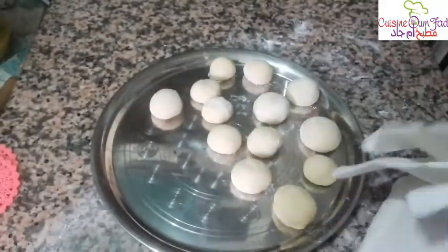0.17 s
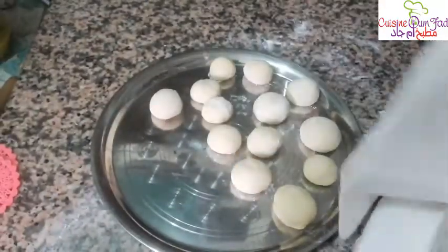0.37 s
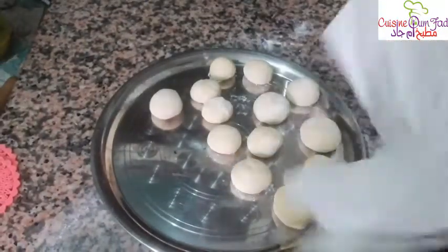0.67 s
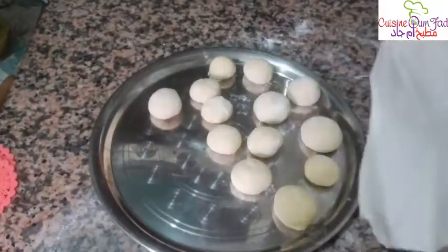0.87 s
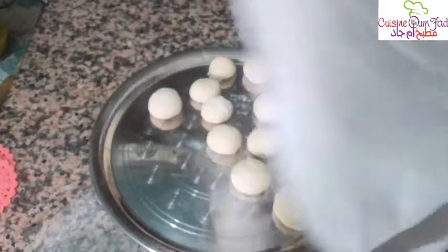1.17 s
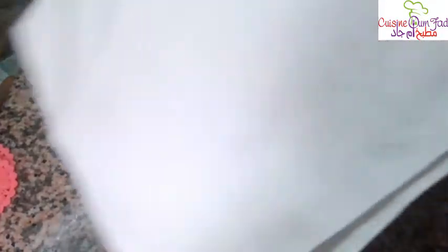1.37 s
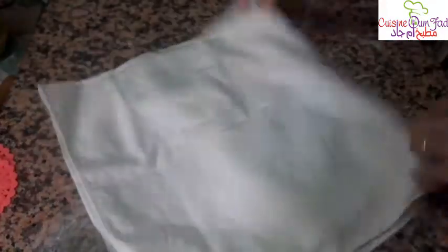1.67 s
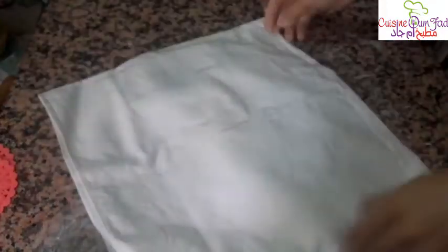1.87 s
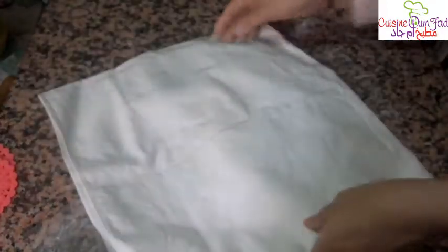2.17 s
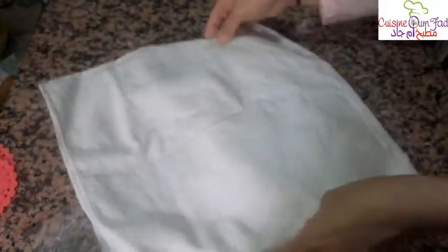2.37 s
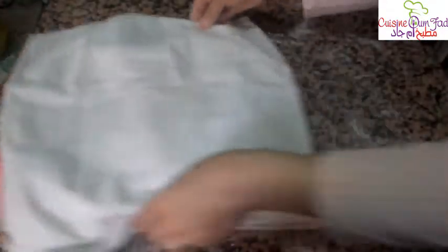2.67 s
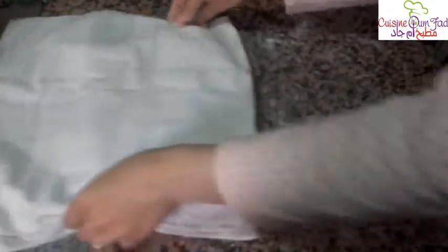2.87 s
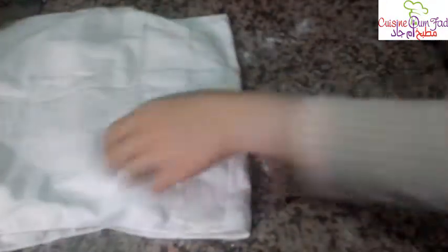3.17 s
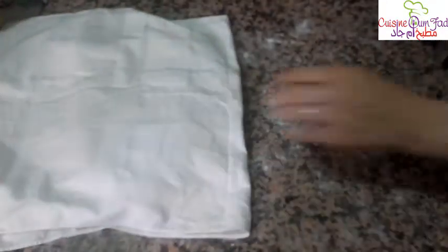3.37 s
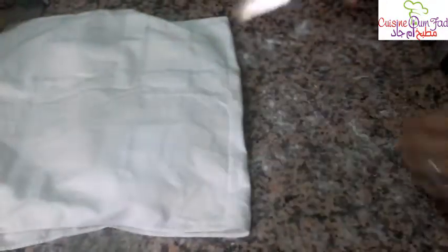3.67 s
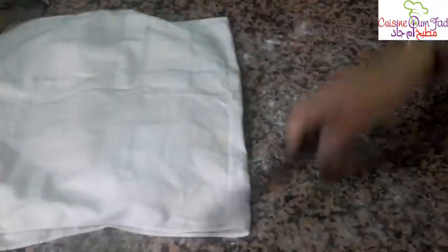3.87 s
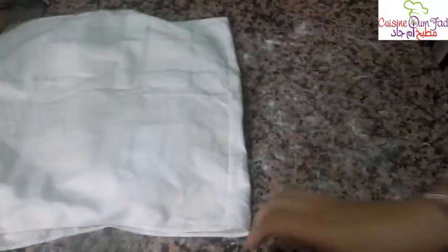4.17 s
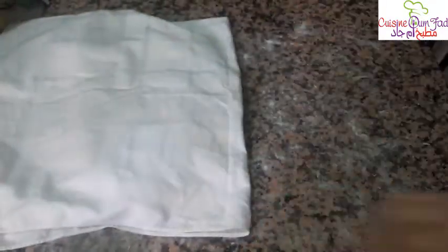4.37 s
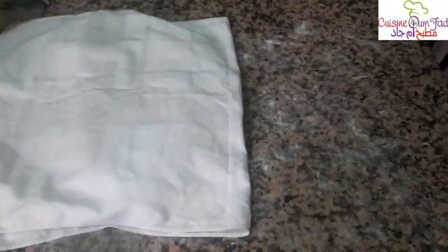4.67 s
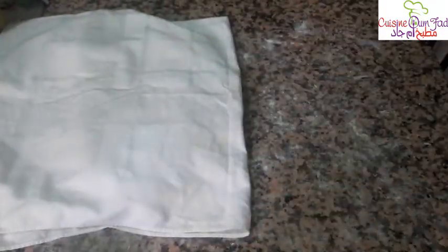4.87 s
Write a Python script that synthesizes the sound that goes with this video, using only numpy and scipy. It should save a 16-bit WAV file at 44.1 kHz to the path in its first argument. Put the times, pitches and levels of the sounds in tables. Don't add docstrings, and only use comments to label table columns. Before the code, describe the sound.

A cloth towel is flapped open and laid over a metal tray, a damped tray knock follows, then a small hard object clicks down in a kitchen.

```python
import sys
import numpy as np
from scipy import signal
from scipy.fft import rfft, irfft, next_fast_len
from scipy.io import wavfile
from scipy.ndimage import uniform_filter1d

SR = 44100
rng = np.random.default_rng(int(sys.argv[2]) if len(sys.argv) > 2 else 0)


def store_pcm(level_fs):
    pcm = np.round(np.clip(level_fs, -1, 1) * 32767).astype(np.int16)
    wavfile.write(sys.argv[1], SR, np.atleast_2d(pcm).T)


def boost(x):
    u = np.asarray(x, float) / 20
    return 10 ** u


N = 220762

# frequency in Hz, density in dB per Hz.
AIR_SPECTRUM = [(9, -26), (15, -13), (32, -28.5), (70, -27), (110, -17.5), (250, -12), (500, -13),
                (870, -14), (1140, -17), (2640, -24.5), (4990, -33.5), (6680, -31.5), (15600, -28.5),
                (15900, -83)]
# frequency in Hz, level in dB rms.
HUM_PARTIALS = [(98.7, -94.5), (296, -76.5), (395, -83.5), (640.6, -89), (1281, -87), (2562, -92),
                (4188, -94.5)]
# time in seconds, level in dB.
WHINE_LEVEL = [(0, -74), (1.2, -76), (1.75, -80.5), (2, -85), (2.85, -81.5), (4.1, -82.5), (4.6, -74),
               (5.01, -80)]

# frequency in Hz, density in dB per Hz.
FLAP_SPECTRUM = [(60, -47), (110, -14.5), (170, -8), (400, -0.5), (620, -0.5), (800, -32)]
# frequency in Hz, density in dB per Hz.
FOLD_SPECTRUM = [(480, -25.5), (650, 0), (1100, 1.5), (1800, 0), (2200, -10.5), (2600, -55)]
# frequency in Hz, density in dB per Hz.
RUB_SPECTRUM = [(1600, -28), (2200, 1), (3500, -4), (5000, -7), (7000, -24)]
# frequency in Hz, density in dB per Hz.
FIBRE_SPECTRUM = [(3800, -21), (5800, -2), (8500, -2), (11000, -2), (15600, -6), (15850, -59)]
# peak time in seconds, length in seconds, folds in dB,
# bulk of sheet moved in dB, dry slide of fibres in dB.
SHAKES = [(.03, 0.33, -73.5, -2, 0), (.158, 0.011, -64.5, 4.5, -11), (.205, 0.037, -71.5, 0, -0.5),
          (.3, 0.053, -70, -3, -5), (.405, 0.071, -58, -5, -4.5), (.45, 0.077, -55.5, -10, -1.5),
          (.478, 0.033, -58, -6, -1.5), (.57, 0.094, -68.5, 0, -0.5), (.626, 0.023, -67, -11, -6),
          (.68, 0.076, -66, -2.5, 0.5), (.76, 0.13, -66, -1.5, -3.5), (.945, 0.06, -70.5, -3, -0.5),
          (.995, 0.077, -70.5, 1, 0.5), (1.138, 0.075, -68, -3, 1), (1.228, 0.068, -66, 2, 1.5),
          (1.3, .1, -76.5, 3, 1), (1.4, .05, -74, 1, 0)]
# peak time in seconds, length in seconds,
# folds in dB, bulk in dB, slide in dB.
TUGS = [(1.69, 0.022, -63.5, 4.5, -14), (1.725, .05, -57.5, -6, -13.5), (1.756, 0.048, -54, 0.5, -15),
        (1.803, 0.058, -55, 2.5, -16.5), (1.885, .07, -70.5, -2, -23), (1.99, 0.054, -83, -6, 2),
        (2.11, 0.077, -70.5, 1, -4), (2.172, 0.074, -61.5, -5, -4.5), (2.27, .07, -65, -5.5, -6),
        (2.314, 0.057, -56, -7.5, -6), (2.356, 0.061, -69.5, 6, -6), (2.408, 0.057, -60, -12, -9.5),
        (2.444, 0.073, -59.5, -6, -13), (2.56, .05, -74.5, 1, -8), (2.792, .1, -72.5, 1, -6),
        (3.068, 0.086, -77, -3, 10)]
# peak time in seconds, length in seconds,
# folds in dB, bulk in dB, slide in dB.
BRUSHES = [(3.39, 0.064, -77, -2, -9), (3.56, 0.076, -77, 0, -7), (3.62, 0.13, -77, -3, -4.5),
           (3.8, 0.029, -72, -7, 1), (4.51, 0.083, -65.5, -1, -9), (4.55, .04, -74, 2, -1),
           (4.618, .09, -62.5, -2, 2), (4.67, .09, -64, -5, -2), (4.757, 0.049, -68, -5, -1),
           (4.8, 0.057, -70, -3, -4), (4.875, 0.088, -75, 2.5, -1.5), (4.94, .05, -74, 4, -6)]
# time in seconds, folds level in dB.
RUSTLE_LEVEL = [(0, -77.5), (1.3, -81.5), (1.55, -89), (2.2, -79.5), (2.85, -79), (3.15, -88.5),
                (4.1, -89.5), (4.6, -73.5), (5.01, -84)]
# start in seconds, peak in dB, pitch in Hz.
SLAPS = [(0.405, -42, 1300), (.451, -42, 1200), (.623, -55, 1500), (1.688, -50, 900), (1.7077, -50, 1300),
         (1.7151, -51, 1100), (1.7395, -47, 900), (1.754, -42, 800), (1.784, -43, 603), (1.7907, -42, 900),
         (1.795, -43, 450), (1.8053, -38, 980), (2.316, -46.5, 1690)]
# start in seconds, peak in dB, centre in Hz, decay rate per second,
# grit from 0 to 1.
THREAD_SNAPS = [
    (.451, -49, 8000, 300, .9),
    (.622, -55, 3440, 180, 0.76),
    (.674, -53, 7370, 93, 0.65),
    (.935, -54, 7240, 270, 0.65),
    (1.226, -51, 7020, 150, .9),
    (1.39, -65, 9100, 120, .9),
    (1.752, -50.5, 4440, 200, .9),
    (3.656, -56, 7060, 770, 0.96),
    (3.798, -53.5, 7930, 180, 0.93),
    (4.752, -65, 6900, 150, 0.8),
]

# frequency in Hz, width in Hz, level in dB,
# time to full swing in seconds.
TRAY_MODES = [(500, 45, -19, 0.0042), (800, 130, -8, 0.0054), (1205, 138, -15, 0.004),
              (1654, 380, 1.5, 0.0044), (2782, 290, -19, 0.0053), (3680, 384, -25, 0.001),
              (4730, 450, -28, 0.0031), (5793, 450, -38, 0.0042), (7470, 320, -42.5, 0.0031)]
# start in seconds, peak in dB, pitch in Hz, length in cycles.
BLOWS = [
    (4.1797, -29.5, 1260, 1.7),
    (4.184, -34, 1290, 1.7),
    (4.2068, -38.5, 1200, 2),
    (4.231, -43, 1240, 3),
    (4.2451, -33, 640, 0.56),
    (4.2521, -22.5, 1646, 5.8),
    (4.2539, -16.5, 1024, 1.67),
    (4.2664, -27, 1200, 1.3),
    (4.283, -40, 1310, 2.2),
]
# start in seconds, peak in dB, centre in Hz,
# decay rate per second, grit from 0 to 1.
CLICKS = [(4.1782, -14.5, 11100, 1000, .8), (4.1786, -29.5, 7230, 370, 0.7),
          (4.1792, -38.5, 3780, 400, 0.3), (4.179, -39, 2950, 400, .2), (4.182, -21, 9300, 1300, 0.51),
          (4.2058, -38, 9000, 1700, 0.81), (4.252, -33, 8000, 1100, .8), (4.2541, -15.5, 3508, 1500, 0.62),
          (4.2557, -30, 6900, 1300, .6), (4.2651, -7.5, 7710, 5900, .3), (4.2731, -31.5, 8050, 880, 0.7),
          (4.282, -34, 8060, 1500, .6)]

# frequency in Hz, t60 in seconds.
KITCHEN_T60 = [(150, 0.61), (500, 0.55), (1500, 0.47), (3000, 0.53), (5000, .4), (8000, .42), (11000, 0.38),
               (15000, .22)]
# delay in seconds, level in dB.
WALL_ECHOES = [(.0065, -4), (.0095, 0.5), (0.0153, -13.5), (0.0192, -8.5), (.025, -17), (.043, -11)]
# frequency in Hz, density in dB per Hz.
KNOCK_FAR = [(120, -58), (200, -27.5), (400, -29), (500, -8), (600, -11), (790, -1), (950, -11),
             (1150, -0.5), (1350, -9), (1620, -1), (2120, -4), (2320, -22.5), (2700, -12.5), (3570, -32.5),
             (4200, -36), (4800, -31), (5400, -38.5), (11700, -69)]
# frequency in Hz, density in dB per Hz.
CLICK_FAR = [(88, -49), (150, -29), (270, -2.5), (520, -2), (830, -13), (1200, -1), (3440, -17.5),
             (4500, -13), (7070, 0.5), (9280, -9.5), (14200, -6.5), (15600, -19), (15900, -70)]
# frequency in Hz, density in dB per Hz.
THUD_FAR = [(59, -62), (156, -11), (300, -13), (390, -2), (580, -8.5), (810, -5), (1500, -1), (2020, -11.5),
            (3000, -12.5), (4400, -20.5), (8000, -51)]
# frequency in Hz, density in dB per Hz.
SNAP_FAR = [(2500, -39.5), (4400, -13), (6500, -4), (9250, -1.5), (12000, -9.5), (15600, -17), (15900, -71)]
# release in seconds, energy in dB.
KNOCK_WET = [
    (2.883, 3.84),
]
# release in seconds, energy in dB.
CLICK_WET = [
    (4.1786, -8.5),
    (4.206, -26),
]
# release in seconds, energy in dB.
THUD_WET = [
    (4.2545, -4.5),
    (4.2655, -15),
    (4.29, -14),
]
# release in seconds, energy in dB.
SNAP_WET = [
    (4.2544, -16.5),
    (4.2644, -5.5),
]

# rub against folds in dB, tilt of the hiss toward the treble in dB.
ON_CLOTH, ON_TRAY, ON_STONE = (-5, 0.3), (-2.17, -1.2), (-0.85, -2.5)


def evened(x):
    return x / np.sqrt(np.mean(x ** 2) + 1e-20)


def read(points, hz):
    f, value = np.transpose(points)
    return np.interp(np.log(hz + 1), np.log(f + 1), value)


def add(mix, start_s, sound):
    part = mix[round(start_s * SR):][:len(sound)]
    part += sound[:len(part)]


def coloured(x, spectrum):
    size = next_fast_len(len(x))
    gain = boost(read(spectrum, np.fft.rfftfreq(size, 1 / SR)))
    return evened(irfft(rfft(x, size) * gain, size)[:len(x)])


def smoothed(x, size, axis=-1):
    return uniform_filter1d(uniform_filter1d(x, size, axis=axis), size, axis=axis)


def drift(size):
    return evened(smoothed(rng.standard_normal(N), size))


def curve(rows):
    t = np.arange(N) / SR
    time_s, level_db = np.transpose(rows)
    fade = np.clip(np.minimum(t - time_s[0], time_s[-1] - t) * 300 + 0.5, 0, 1)
    return fade * boost(np.interp(t, time_s, level_db))


def butter(x, order, hz, kind):
    return signal.sosfilt(signal.butter(order, hz, kind, fs=SR, output="sos"), x)


def split(x, hz):
    low = signal.sosfiltfilt(signal.butter(2, hz, fs=SR, output="sos"), x)
    return np.array([low, x - low])


def wavelet(hz, cycles):
    u = np.arange(int(6 * cycles * SR / hz)) * hz / SR / cycles * 4
    return u ** 2 * np.exp(2 - u) / 4 * np.sin(2 * np.pi * u * cycles / 4)


def bursts(events):
    out, t = np.zeros(N), np.arange(1400) / SR
    for start_s, db, hz, rate, grit in events:
        noise = rng.standard_normal(len(t))
        grain = 1 - grit + grit * evened(uniform_filter1d(noise, size=6))
        envelope = np.minimum(t / 0.00014, 1) * np.exp(-t * rate)
        shape = envelope * grain * np.sin(2 * np.pi * hz * t)
        add(out, start_s, boost(db) * shape / abs(shape).max())
    return butter(out, 3, 2600, "high")


def hum():
    t, out = np.arange(N) / SR, np.zeros(N)
    for hz, db in HUM_PARTIALS:
        level = boost(db + 3.5 + 0.9 * drift(size=9000))
        out += level * np.sin(2 * np.pi * (hz * t + 0.03 * drift(size=6000)))
    return out


def air(level_db=-70):
    _, _, z = signal.stft(coloured(rng.standard_normal(N), AIR_SPECTRUM), SR, nperseg=512)
    patches = uniform_filter1d(rng.standard_normal(z.shape), size=8, axis=0)
    patches = evened(uniform_filter1d(patches, size=10, axis=1))
    noise = evened(signal.istft(z * boost(0.66 * patches), SR, nperseg=512)[1][:N])
    return boost(level_db) * noise * boost(0.7 * drift(size=5000))


def whine(hz=488.6):
    cycles = hz * np.arange(N) / SR + 0.074 * drift(size=3000)
    return np.sqrt(2) * curve(WHINE_LEVEL) * np.sin(2 * np.pi * cycles)


def scratch(per_s, spread_db, smooth):
    size = boost(spread_db * np.minimum(rng.exponential(1, N), 4))
    size = size * (rng.random(N) < per_s / SR)
    return evened(size * rng.standard_normal(N)) + smooth * rng.standard_normal(N)


def fibres():
    hiss = coloured(scratch(6000, 2.2, 1.0), FIBRE_SPECTRUM)
    return split(hiss, 9500) * boost(1.0 * drift(size=200))


def strokes(rows, surface, rise_share=0.52, edge_db=-9.0, pointed=1.33, rub_follows_slide=0.77):
    peak_s, length_s, db, bulk_db, slide_db = np.transpose(rows)[:, :, None]
    rub_db, tilt_db = surface
    coarse = np.arange(0, N, 32)
    u = (coarse / SR - peak_s) / length_s
    distance = np.where(u < 0, -u / rise_share, u / (1 - rise_share))
    swell = boost(db + edge_db * distance ** pointed)
    layers_db = [bulk_db, 0 * db, rub_db + rub_follows_slide * slide_db,
                 slide_db - tilt_db, slide_db + tilt_db]
    powers = [((swell * boost(layer_db)) ** 2).sum(0) for layer_db in layers_db]
    return np.array([np.interp(np.arange(N), coarse, power) for power in powers])


def cloth():
    flap = coloured(scratch(600, 1.0, 1.4), FLAP_SPECTRUM) * boost(1.4 * drift(size=400))
    folds = coloured(scratch(1500, 2.8, 1.26), FOLD_SPECTRUM) * boost(1.25 * drift(size=300))
    rub = coloured(scratch(3300, 2.21, 1.9), RUB_SPECTRUM) * boost(1.6 * drift(size=200))
    layers = [flap, folds, rub, *fibres()]
    power = strokes(SHAKES, ON_CLOTH) + strokes(TUGS, ON_TRAY) + strokes(BRUSHES, ON_STONE)
    rustle_db = [[-3.5], [0], [-5.5], [-6.5], [-6.5]]
    rustle = boost(rustle_db) * curve(RUSTLE_LEVEL)
    out = (np.sqrt(power + rustle ** 2) * layers).sum(0)
    for start_s, db, hz in SLAPS:
        add(out, start_s, boost(db) * wavelet(hz, 1.54))
    return out


def knock(start_s=2.8792, peak_db=-8.5):
    t, out, ring = np.arange(1500) / SR, np.zeros(N), 0
    for hz, width_hz, db, rise_s in TRAY_MODES:
        swell = np.sin(np.pi / 2 * np.minimum(t / rise_s, 1)) ** 2
        decay = np.exp(-np.pi * width_hz * np.maximum(t - rise_s, 0))
        ring = ring + boost(db) * swell * decay * np.sin(2 * np.pi * hz * t)
    add(out, start_s, boost(peak_db) * ring / abs(ring).max())
    return out


def kitchen(releases, spectrum, walls_db, linger):
    taps, out = np.zeros(SR), np.zeros(N)
    at = np.arange(60, SR - 10, 10)
    taps[at + rng.integers(0, 10, len(at))] = rng.choice([-1., 1.], len(at))
    taps *= boost(2.1 * drift(size=100)[:SR])
    for delay_s, db in WALL_ECHOES:
        add(taps, delay_s, boost(db + walls_db) * rng.choice([-1., 1.], 1))
    hz, t, z = signal.stft(taps, SR, nperseg=256)
    fade = boost(-60 * t / (linger * read(KITCHEN_T60, hz)[:, None]))
    tail = coloured(signal.istft(z * fade, SR, nperseg=256)[1], spectrum)
    tail *= np.minimum(np.arange(len(tail)) / 60, 1)
    for start_s, db in releases:
        add(out, start_s, boost(db) * tail / np.linalg.norm(tail))
    return out


def wall_returns(rim):
    return sum(boost(db - 13.0) * np.roll(rim, round(delay_s * SR)) for delay_s, db in WALL_ECHOES)


def drop():
    out = bursts(CLICKS)
    for start_s, db, hz, cycles in BLOWS:
        add(out, start_s, boost(db) * wavelet(hz, cycles))
    return out


def suppressed(hits, floor, depth_db=10.0, shut_db=-64.0, open_db=-50.0, treble_db=14.5):
    power = signal.lfilter([0.002], [1, -0.998], split(hits, 5000) ** 2)
    low_key = power.sum(0)
    high_key = np.maximum(power[0], power[1] * boost(treble_db) ** 2)
    level_db = 10 * np.log10([low_key + 1e-12, high_key + 1e-12])
    opening = np.clip((level_db - shut_db) / (open_db - shut_db), 0, 1)
    bands = split(hits + floor * boost(depth_db), 5000)
    return (bands * boost(depth_db * (opening - 1))).sum(0)


def scene():
    floor = air() + hum()
    near = cloth() + bursts(THREAD_SNAPS) + whine()
    rim = knock()
    room = kitchen(KNOCK_WET, KNOCK_FAR, walls_db=16.0, linger=0.99)
    room += kitchen(CLICK_WET, CLICK_FAR, walls_db=12.0, linger=0.96)
    room += kitchen(THUD_WET, THUD_FAR, walls_db=11.0, linger=0.89)
    room += kitchen(SNAP_WET, SNAP_FAR, walls_db=12.0, linger=1.0)
    room += wall_returns(rim)
    hits = butter(rim + drop() + room, 2, 170, "high")
    return (near + suppressed(hits, floor))[None]


def low_pass(x, hz):
    taps = signal.firwin(301, hz, window=("kaiser", 7), fs=SR)
    return signal.oaconvolve(x, taps[None], "same")


def band_limit(x):
    return signal.sosfilt(signal.butter(12, 16690, fs=SR, output="sos"), x)


def record(dry):
    dry = dry - 0.9 * (dry - low_pass(dry, 15850))
    top = dry - low_pass(dry, 15250)
    hiss = np.diff(dry, prepend=0)
    quiet = uniform_filter1d(hiss ** 2, size=1500) < boost(-68.0) ** 2
    gate = uniform_filter1d(1.0 * quiet, size=400)
    return band_limit(dry - top * gate - 0.0003)


dry = scene()
out = record(dry)
store_pcm(out)
```